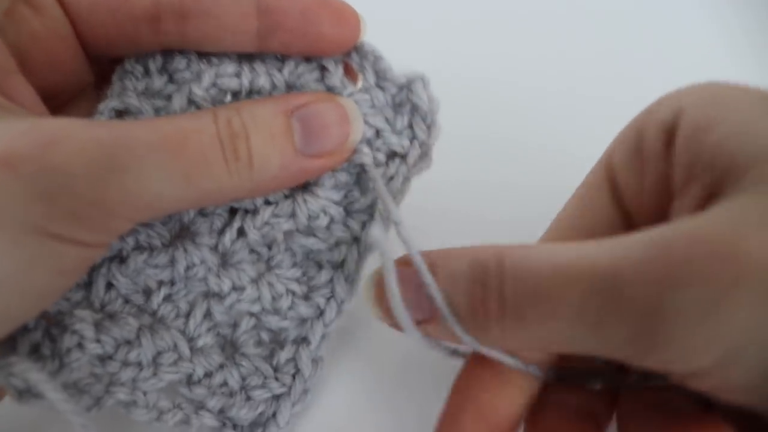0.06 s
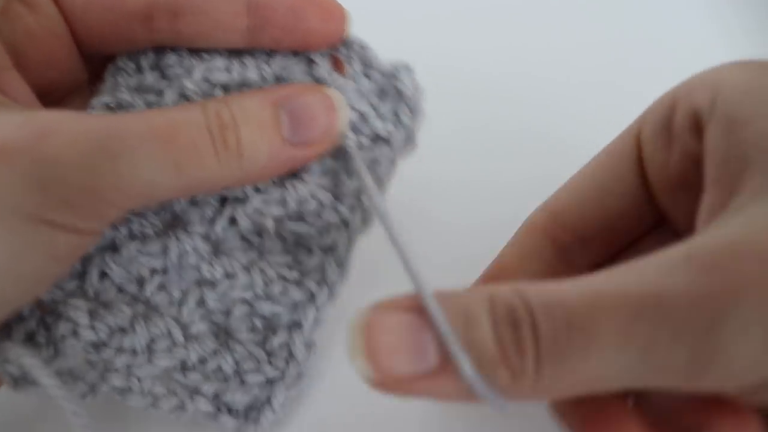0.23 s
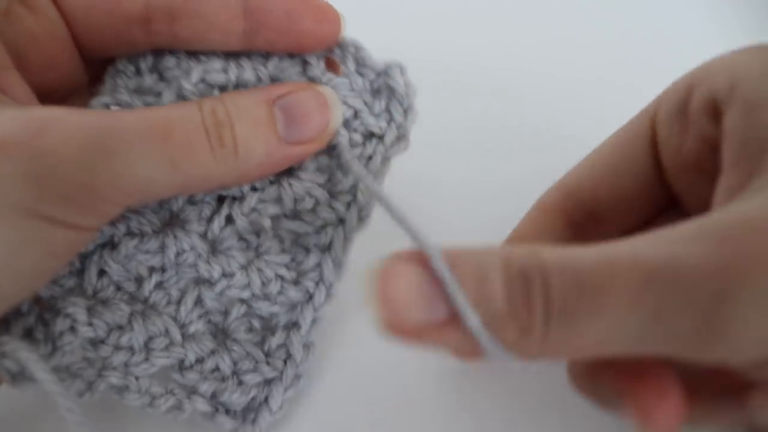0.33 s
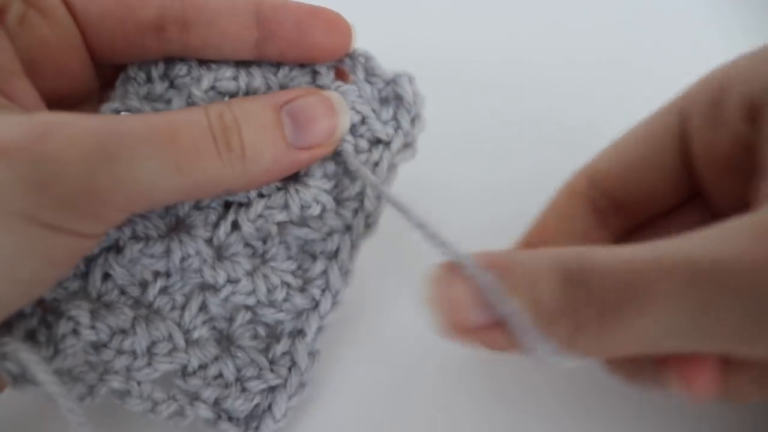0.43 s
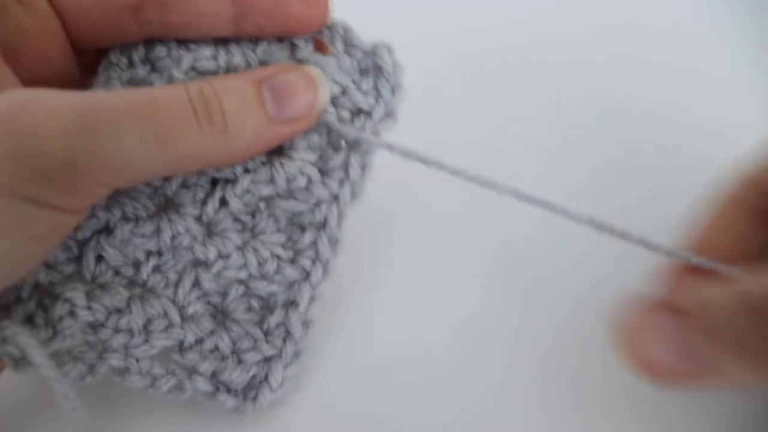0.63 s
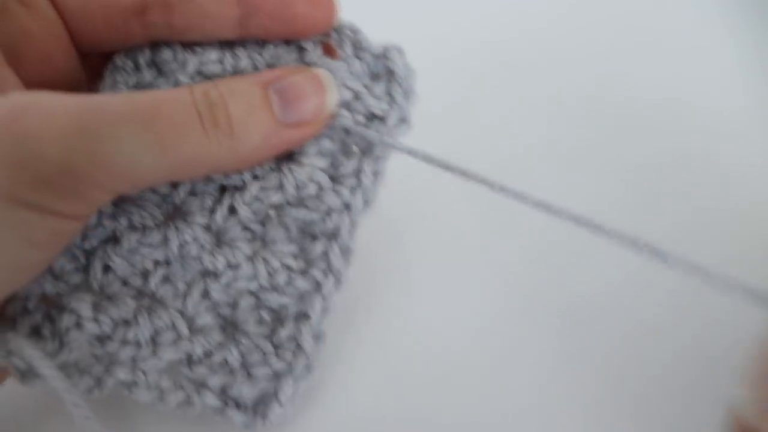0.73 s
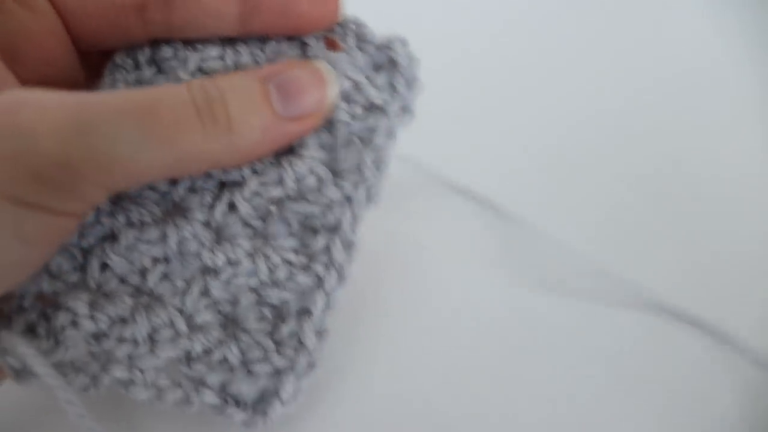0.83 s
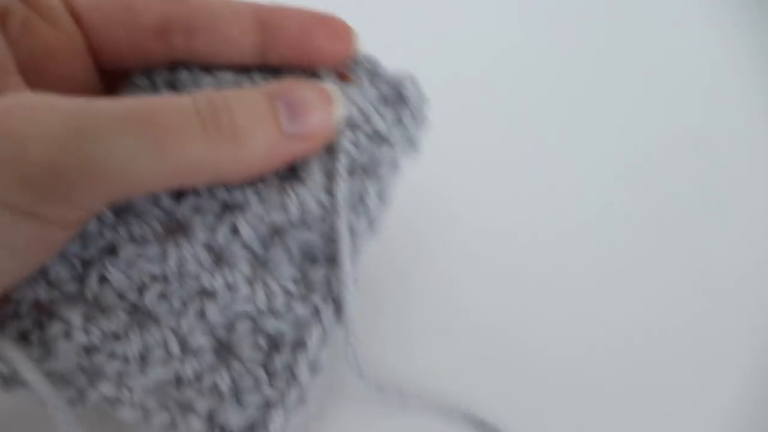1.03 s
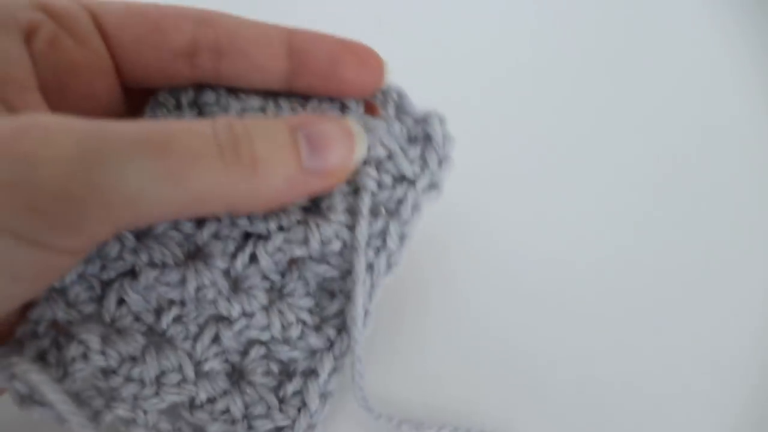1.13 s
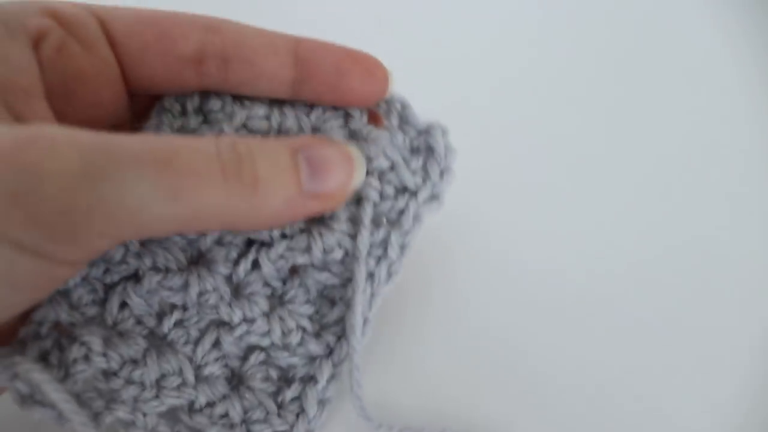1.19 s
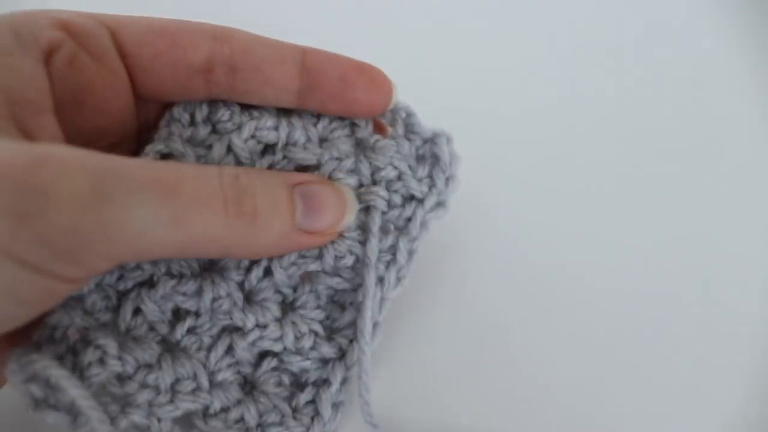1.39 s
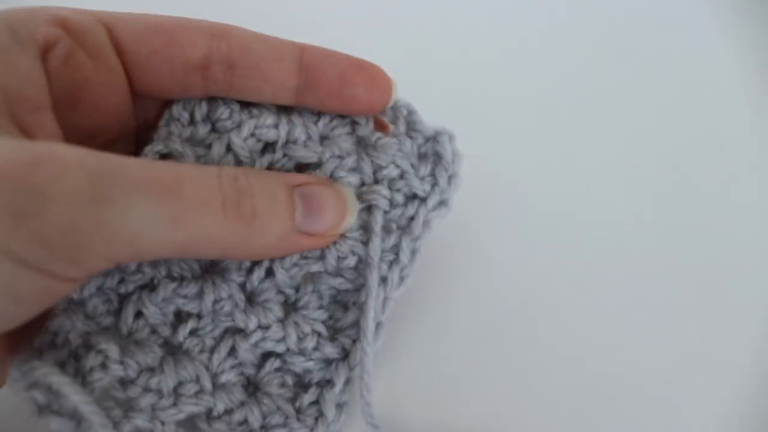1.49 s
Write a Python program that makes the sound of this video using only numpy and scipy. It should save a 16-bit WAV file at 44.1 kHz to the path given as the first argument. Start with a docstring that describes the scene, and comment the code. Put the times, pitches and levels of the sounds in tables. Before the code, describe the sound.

A single sharp, dead tap lands close by at about 0.2 seconds, with a very brief room echo. From 0.7 to 0.9 seconds a strand of yarn hisses faintly through fingers while knitted fabric rustles. The fabric shifts softly again around 1.3 seconds, and a fingertip makes a soft, padded bump near 1.5 seconds. A low, quiet room hum runs underneath throughout.

```python
"""Hands work yarn over a table, close to a camera in a quiet room with a low hum.
After a barely audible slide of yarn, one sharp, dead tap lands at 0.22 s and the room answers briefly.
From about 0.7 s a strand is drawn through the fingers with a faint hiss and the knitting shifts.
It shifts again around 1.3 s, with a thin whisper on top, and at 1.47 s a finger bumps down softly."""
import sys
import numpy as np
from scipy import signal
from scipy.fft import rfft, irfft
from scipy.io import wavfile
from scipy.ndimage import map_coordinates

SR = 44100
rng = np.random.default_rng(int(sys.argv[2]) if len(sys.argv) > 2 else 0)


def pcm_store(signal):
    """Save signal as 16-bit PCM."""
    levels = np.round(np.clip(np.atleast_2d(signal), -1, 1) * 32767)
    wavfile.write(sys.argv[1], SR, levels.astype(np.int16).T)


N = 68355
TIME = np.arange(N) / SR
FREQS = np.fft.rfftfreq(2 * N, 1 / SR)  # bins of a double-length transform [Hz]


def amp(db):
    """Decibels to gain."""
    return 10 ** (np.asarray(db) / 20)


def unit(x):
    """Scale to rms 1."""
    return x / np.sqrt(np.mean(x ** 2) + 1e-20)


def curve(points, hz=FREQS):
    """Read (frequency, value) breakpoints on a log frequency axis."""
    freqs, values = np.transpose(points)
    return np.interp(np.log(hz + 1), np.log(freqs + 1), values)


def filtered(x, response):
    """Play x through a frequency response."""
    return irfft(rfft(x, 2 * N) * response)[..., :N]


def delay(seconds):
    """Frequency response of a delay."""
    return np.exp(-2j * np.pi * FREQS * seconds)


def impulse(eq):
    """Spectrum of a minimum-phase hit: the given tone, with its energy up front."""
    cepstrum = irfft(np.log(amp(curve(eq))))
    cepstrum[1:N] *= 2
    cepstrum[N + 1:] = 0
    return np.exp(rfft(cepstrum))


def wobble(per_s):
    """Smooth random modulation through per_s points a second."""
    return map_coordinates(rng.standard_normal(N), [TIME * per_s], mode="mirror")


def pan(db):
    """Left and right gains, the left louder by db."""
    return amp(np.array([np.atleast_1d(db), -np.atleast_1d(db)]) / 2)


def noise(eq, correlation):
    """Shaped stereo noise of rms 1; the lower the correlation, the wider it sits."""
    width = np.arccos(np.clip(curve(correlation), -1, 1)) / 2
    mid_side_eq = amp(curve(eq)) * np.array([np.cos(width), np.sin(width)])
    mid, side = filtered(rng.standard_normal((2, N)), mid_side_eq)
    return unit(np.array([mid + side, mid - side]))


# Bass-heavy noise bed (frequency [Hz], level [dB])
BED_EQ = [(15, -19), (25, -21.5), (59, -1.5), (96, -8), (240, -14.5), (340, -15), (457, -17.5),
          (495, -17.5), (826, -19.5), (919, -19), (1020, -22.5), (1380, -21.5), (15500, -37)]
# Near-mono rumble, wide hiss (frequency [Hz], left-right correlation [0-1])
BED_IMAGE = [(60, .99), (150, 0.77), (380, 0.42), (950, 0.38), (2400, 0.1), (6000, 0.22)]
def room_tone(bed_db=-52, hum_db=-53.5, hum_hz=90.1):
    """A steady bed of rumble and hiss under a low hum that wavers in level and pitch."""
    waver = amp(wobble(per_s=11.85))
    phase_drift = 0.9 * wobble(per_s=7.84)
    hum = unit(waver * np.sin(2 * np.pi * hum_hz * TIME + phase_drift))
    return amp(bed_db) * noise(BED_EQ, BED_IMAGE) + amp(hum_db) * hum


# Friction: narrow lows, wide highs (frequency [Hz], left-right correlation [0-1])
RUB_IMAGE = [(100, 0.98), (500, 0.93), (1600, 0), (10000, 0)]
def rubbing(strokes, eq, snags_per_s=280, snag_db=1):
    """Friction noise that swells and fades with each stroke; catching fibres add grain."""
    envelope = 0
    for peak_s, rise_s, fall_s, db, pan_db in strokes:
        width_s = np.where(TIME < peak_s, rise_s, fall_s)
        envelope += amp(db) * pan(pan_db) * np.exp(-((TIME - peak_s) / width_s) ** 2 / 2)
    return envelope * unit(noise(eq, RUB_IMAGE) * amp(snag_db * wobble(snags_per_s)))


# Whisper stroke (peak time [s], rise [s], fall [s], level [dB], left minus right [dB])
WHISPER_STROKES = [(1.38, 0.038, 0.061, -57.5, 2)]
# Narrow band near 7 kHz (frequency [Hz], level [dB])
WHISPER_EQ = [(3000, -32), (6100, -15), (6950, 3), (7700, -13), (11000, -21), (15000, -33)]
def whisper():
    """A light rub heard as a thin, high hiss."""
    return rubbing(WHISPER_STROKES, WHISPER_EQ)


# Cloth moves (peak time [s], rise [s], fall [s], level [dB], left minus right [dB])
KNITTING_STROKES = [(.77, 0.059, 0.058, -56, 4.5), (.92, 0.034, 0.03, -54.5, 0),
                    (1.25, 0.092, 0.044, -59.5, 5), (1.4, 0.063, 0.056, -56, 1.5)]
# Muffled rustle (frequency [Hz], level [dB])
KNITTING_EQ = [(100, 2), (250, -5), (460, 3), (700, -9), (1500, -6), (4000, -29)]
def knitting_shifts():
    """The knitting rubs softly as it shifts in the hand."""
    return rubbing(KNITTING_STROKES, KNITTING_EQ)


# Pulls of yarn (peak time [s], rise [s], fall [s], level [dB], left minus right [dB])
STRAND_STROKES = [(.06, .03, 0.023, -66, 0), (.69, 0.075, 0.051, -55, -5), (.81, 0.039, 0.054, -54.5, -6.5),
                  (1.315, 0.0086, 0.01, -58.5, -2)]
# Airy fibre hiss (frequency [Hz], level [dB])
STRAND_EQ = [(200, -22), (900, -9), (1900, -3), (2750, 1), (4600, -4.5), (8000, 0.5), (11000, -4),
             (15500, -18)]
def strand_slides():
    """A strand hisses as it slides through the fingers."""
    return rubbing(STRAND_STROKES, STRAND_EQ)


# Soft finger hits (time [s], gain [dB])
BUMP_HITS = [(1.4666, 3.5), (1.473, -13.5), (1.5255, -8.5)]
# Padded thud (frequency [Hz], level [dB])
BUMP_EQ = [(30, -28), (80, -1), (140, 1), (300, 1), (550, -16.5), (1000, -18.5), (2000, -68), (6000, -55),
           (15000, -75)]
# Room image, widening toward the top (frequency [Hz], left-right correlation [0-1])
ROOM_IMAGE = [(100, 0.95), (400, 0.92), (1000, 0.72), (3000, 0.39), (12000, .1)]
def finger_bumps(tail_db=-50.5, t60_s=0.18):
    """A fingertip lands: each padded contact gives a low thud and a little room tail."""
    hits = sum(amp(db) * delay(at_s) for at_s, db in BUMP_HITS)
    thuds = irfft(impulse(BUMP_EQ) * hits)[:N]
    fade = sum((TIME > at_s) * amp(db - 60 * abs(TIME - at_s) / t60_s) for at_s, db in BUMP_HITS)
    return thuds + amp(tail_db) * fade * noise(BUMP_EQ, ROOM_IMAGE)


TAP_S = 0.224  # cue for the tap, its graze, scatter and reverb
# Reverb colour (frequency [Hz], level [dB])
REVERB_EQ = [(60, -2), (130, -1), (220, -8.5), (310, -2.5), (420, -2.5), (700, -8.5), (1500, -15.5),
             (2900, -13), (3550, -10), (4400, -18), (6000, -13), (7200, -5), (8500, -14), (11000, -19),
             (15500, -32)]
# Reverb length (frequency [Hz], time to fall 60 dB [s])
REVERB_T60 = [(150, 0.24), (600, 0.29), (2500, 0.24), (7000, 0.24), (14000, 0.19)]
def tap_reverb(level_db=-30.5, build_s=0.0017, wall_s=0.044, treble_hz=2180, early_treble_db=-11.5):
    """The room's diffuse answer: the treble opens up around wall_s, and each band dies at its own rate."""
    hz, frame_s, bands = signal.stft(noise(REVERB_EQ, ROOM_IMAGE), SR, nperseg=128)
    age = np.maximum(frame_s - TAP_S, 0)
    treble = hz ** 2 / (hz ** 2 + treble_hz ** 2)
    dip_db = early_treble_db * np.outer(treble, np.exp(-(age / wall_s) ** 4))
    decay_db = -60 * age / curve(REVERB_T60, hz)[:, None]
    tail = signal.istft(bands * amp(dip_db + decay_db))[1][:, :N]
    fade_in = 1 - np.exp(-np.maximum(TIME - TAP_S, 0) / build_s)
    return amp(level_db) * tail * fade_in


# Bright splash (frequency [Hz], level [dB])
SCATTER_EQ = [(500, 4), (1300, 2.5), (4000, -7), (6500, -1.5), (9000, -4.5), (15500, -12)]
def tap_scatter(level_db=-29, t60_s=0.036):
    """Clutter close by scatters the tap into a short burst of noise."""
    age = TIME - TAP_S
    return (age > 0) * amp(level_db - 60 * abs(age) / t60_s) * noise(SCATTER_EQ, ROOM_IMAGE)


# Midrange tick (frequency [Hz], level [dB])
GRAZE_EQ = [(200, -16), (1000, 11), (2500, -22), (7000, -17), (15000, -39)]
def tap_graze(level_db=-29.5, lead_s=0.0018, width_s=0.00053):
    """A light touch just before the blow."""
    envelope = np.exp(-((TIME - TAP_S + lead_s) / width_s) ** 2 / 2)
    return amp(level_db) * envelope * noise(GRAZE_EQ, ROOM_IMAGE)


# Dead body of the tap (frequency [Hz], level [dB])
KNOCK_EQ = [(30, -11), (100, 20.5), (220, 24.5), (480, 18.5), (750, 16.5), (1250, 13.5), (1800, 5),
            (3000, 4.5), (4000, 2), (4800, -19), (5500, 2.5), (8500, -2.5), (12000, -14.5), (16000, -29)]
# Its short ring (frequency [Hz], level [dB], time to fall 60 dB [s])
TAP_MODES = [(1350, -25, 0.01), (2110, -24.5, 0.014), (2540, -26, 0.0049), (3440, -22, .009),
             (5470, -34.5, 0.012), (6510, -25, 0.0085), (7030, -18, 0.0089), (8220, -30, 0.0061)]
# Bounces off table and hands (delay [s], left gain [dB], right gain [dB], low-pass cutoff [Hz])
TAP_BOUNCES = [(.00017, -13.5, -20, 12200), (.0011, -37, -27, 8000), (.0022, -18.5, -14.5, 14000),
               (.0044, -24, -15, 1200)]
# Pan by band (frequency [Hz], left minus right [dB])
TAP_PAN = [(200, 0), (600, -2.5), (1200, 3), (2400, -4.5), (4000, -3), (7000, -3.5), (12000, -2)]
# Later arrival on the left (frequency [Hz], delay [s])
TAP_LEFT_LAG = [(500, 0.000022), (3500, 0.000053), (5500, 0.000041), (7000, 0.000027), (12000, 0.000017)]
def tap(gain_db=-0.5):
    """One hard contact: a dead knock and quickly damped modes, bouncing off nearby surfaces."""
    ring = sum(amp(db - 60 * TIME / t60) * np.sin(2 * np.pi * hz * TIME) for hz, db, t60 in TAP_MODES)
    hit = impulse(KNOCK_EQ) + rfft(ring, 2 * N)
    bounces = sum(amp([[left_db], [right_db]]) * delay(lag_s) / (1 + 1j * FREQS / cutoff_hz)
                  for lag_s, left_db, right_db, cutoff_hz in TAP_BOUNCES)
    arrival = np.array([delay(TAP_S + curve(TAP_LEFT_LAG)), delay(TAP_S)])
    return amp(gain_db) * irfft(hit * (1 + bounces) * arrival * pan(curve(TAP_PAN)))[:, :N]


def scene():
    """The mix: one tap up front, quiet handling behind it, room tone underneath."""
    yarn = strand_slides() + knitting_shifts() + whisper()
    tap_in_room = tap() + tap_graze() + tap_scatter() + tap_reverb()
    return tap_in_room + finger_bumps() + yarn + room_tone()


def record(dry, ceiling_db=-1.5, cutoff_hz=15900):
    """The camera rounds off the tap's peak and cuts the very top with a steep low-pass."""
    rounded = dry / (1 + (dry / amp(ceiling_db)) ** 6) ** (1 / 6)
    return filtered(rounded, 1 / (1 + (FREQS / cutoff_hz) ** 120))


dry = scene()
out = record(dry)
pcm_store(out)
```